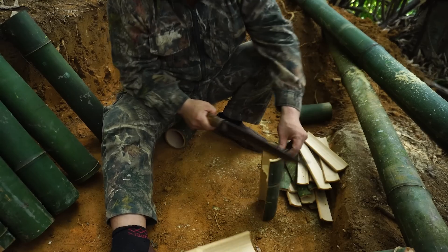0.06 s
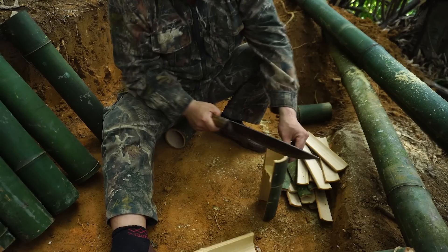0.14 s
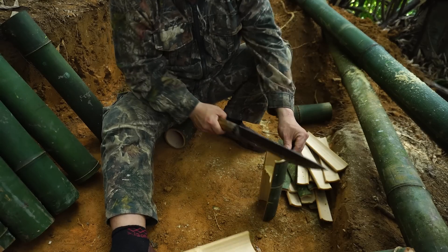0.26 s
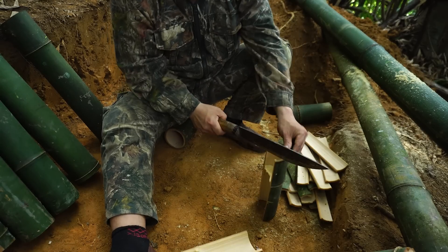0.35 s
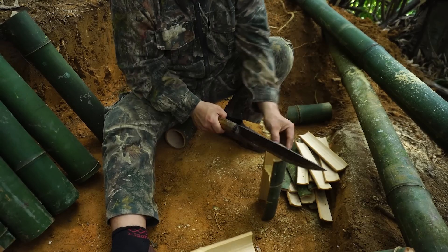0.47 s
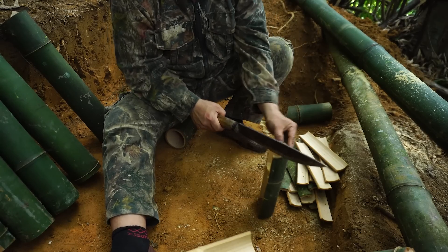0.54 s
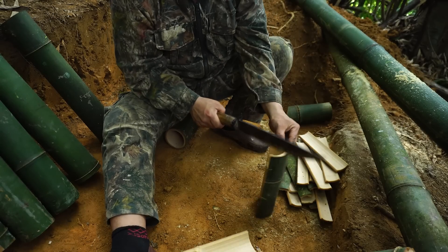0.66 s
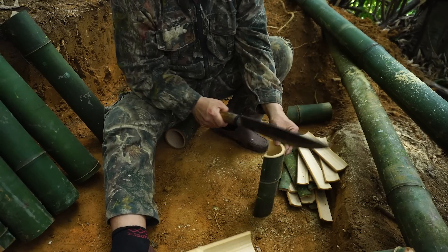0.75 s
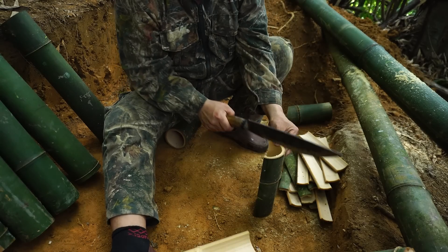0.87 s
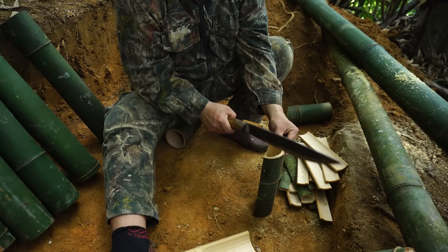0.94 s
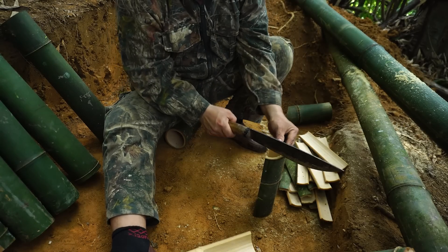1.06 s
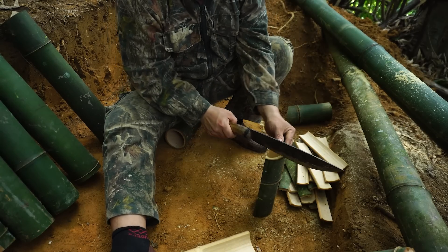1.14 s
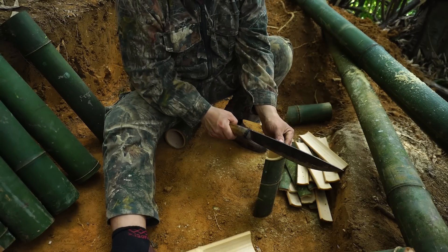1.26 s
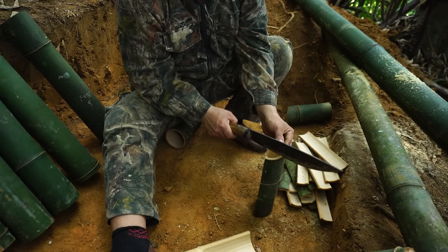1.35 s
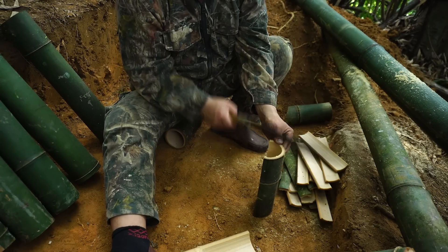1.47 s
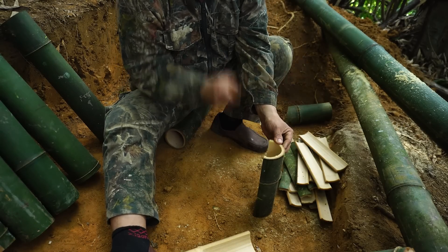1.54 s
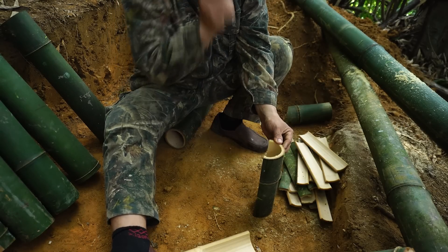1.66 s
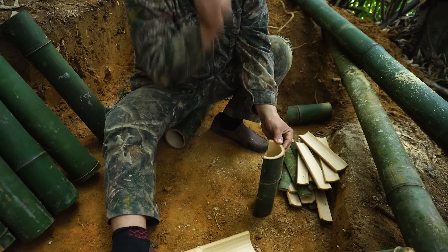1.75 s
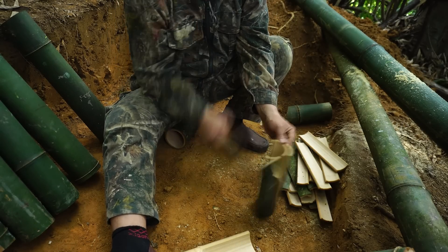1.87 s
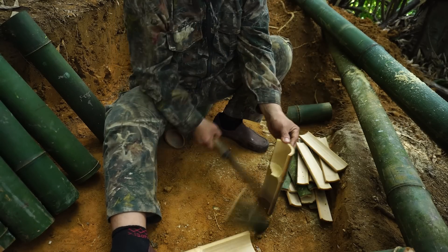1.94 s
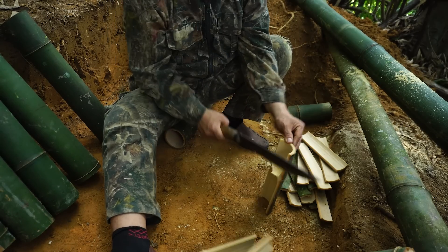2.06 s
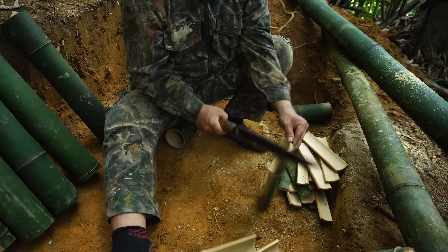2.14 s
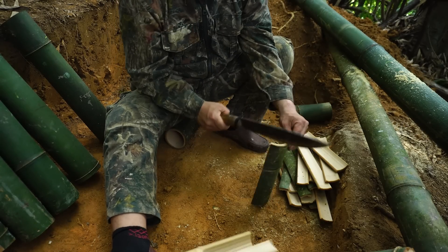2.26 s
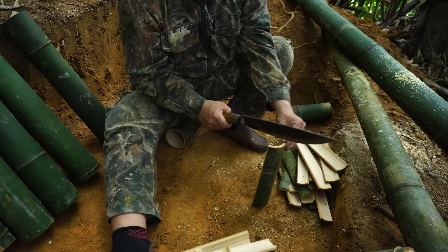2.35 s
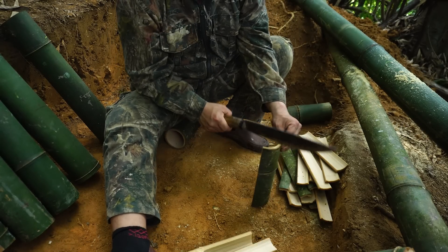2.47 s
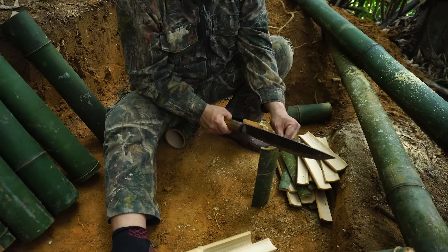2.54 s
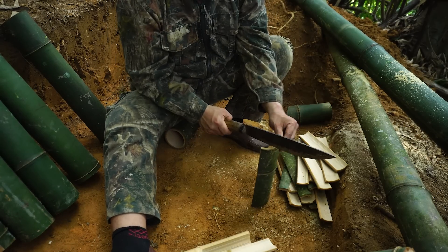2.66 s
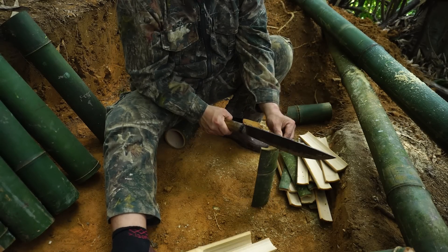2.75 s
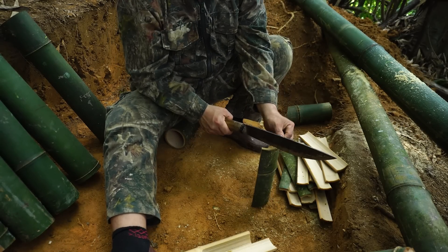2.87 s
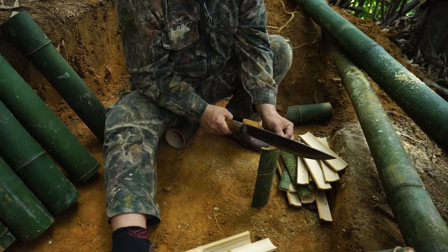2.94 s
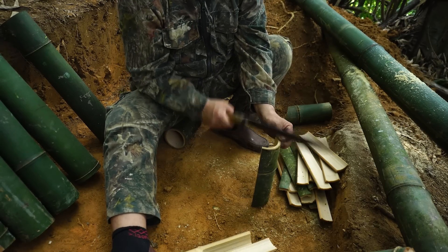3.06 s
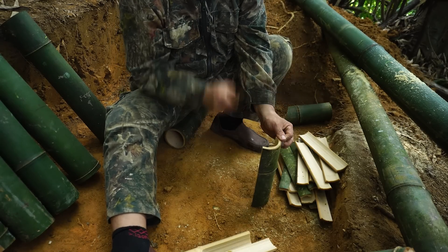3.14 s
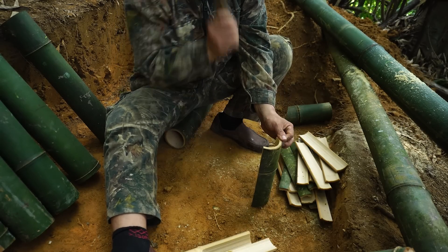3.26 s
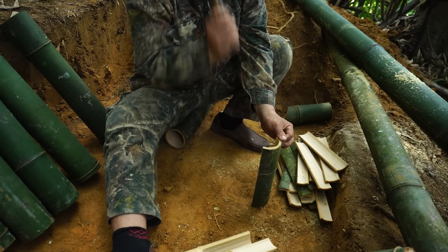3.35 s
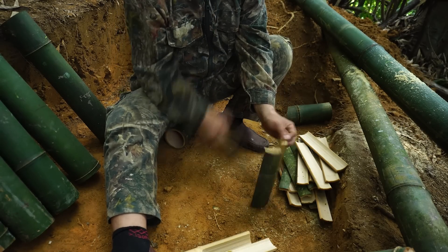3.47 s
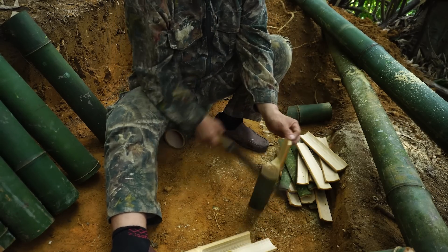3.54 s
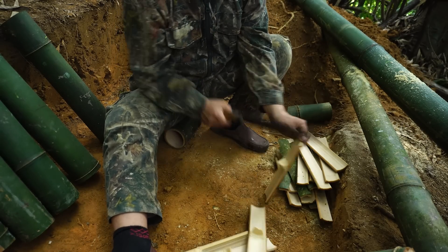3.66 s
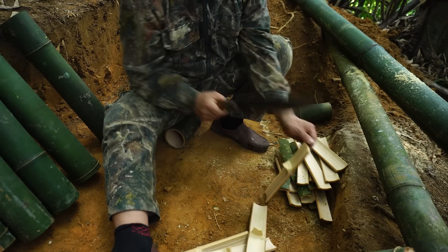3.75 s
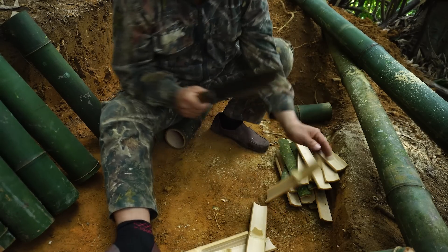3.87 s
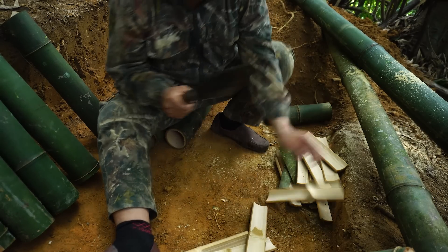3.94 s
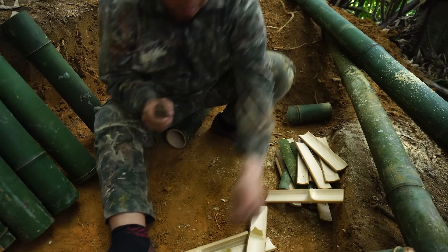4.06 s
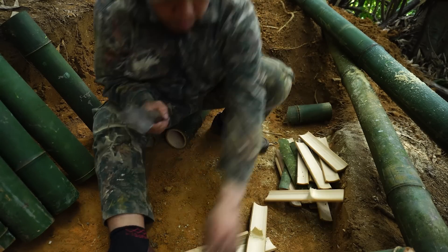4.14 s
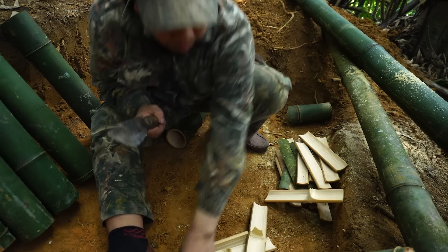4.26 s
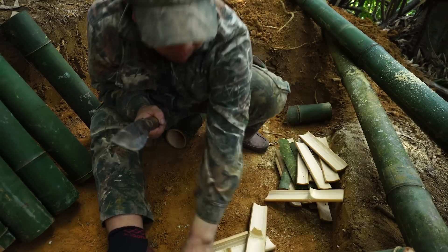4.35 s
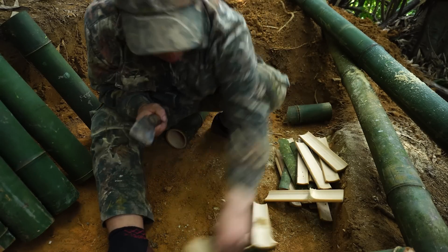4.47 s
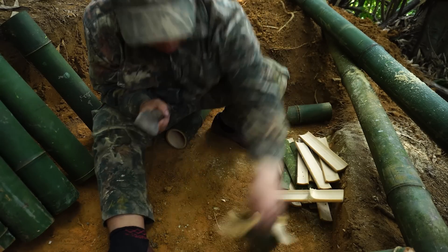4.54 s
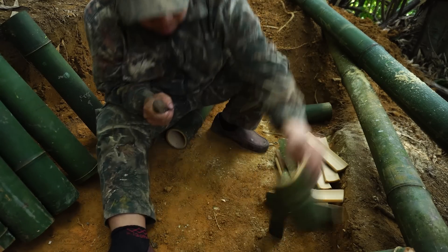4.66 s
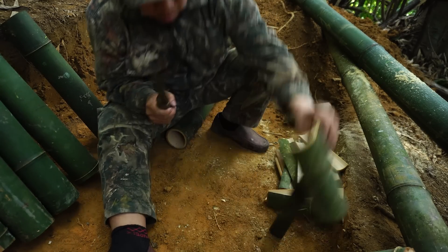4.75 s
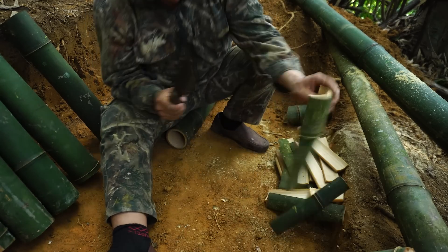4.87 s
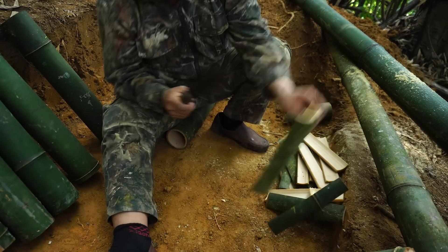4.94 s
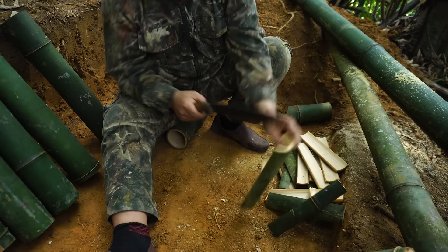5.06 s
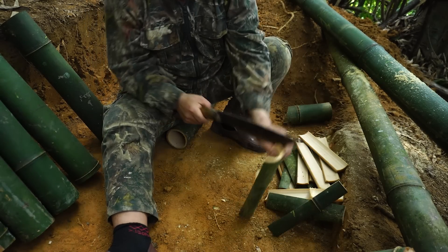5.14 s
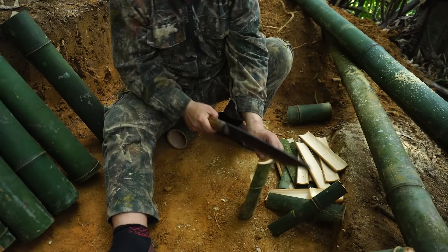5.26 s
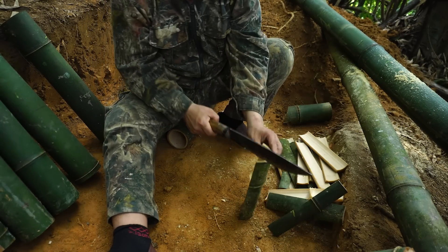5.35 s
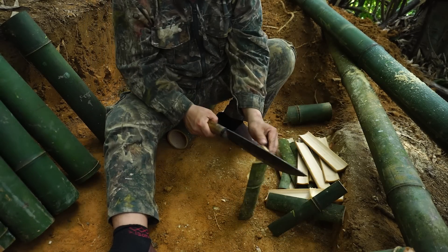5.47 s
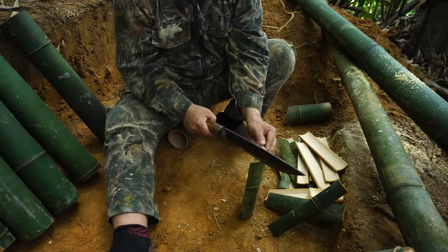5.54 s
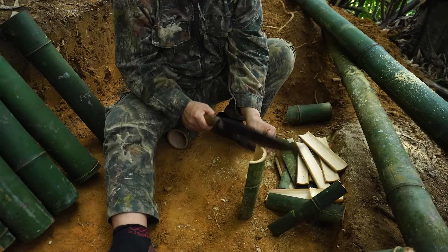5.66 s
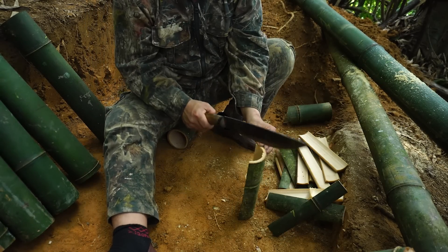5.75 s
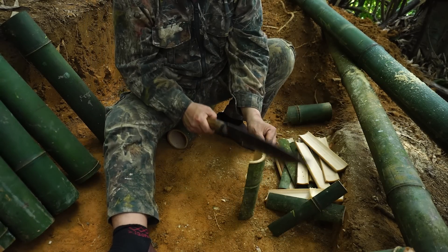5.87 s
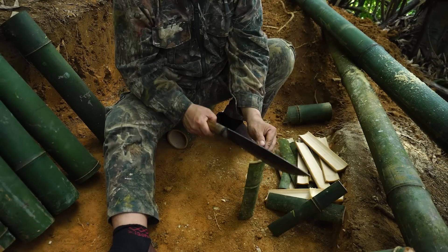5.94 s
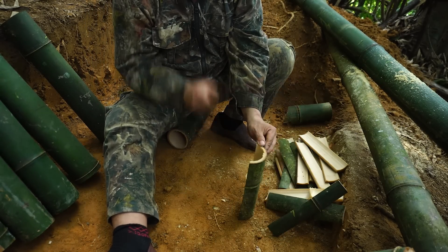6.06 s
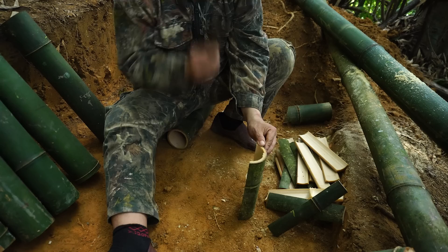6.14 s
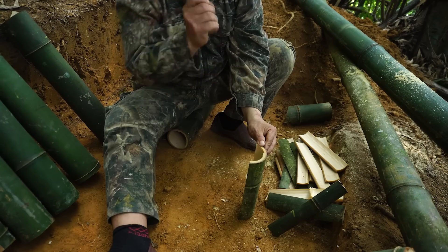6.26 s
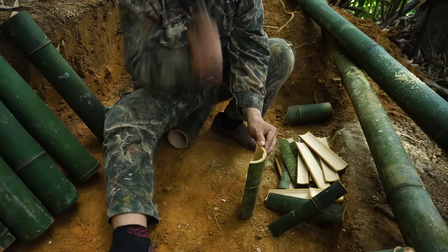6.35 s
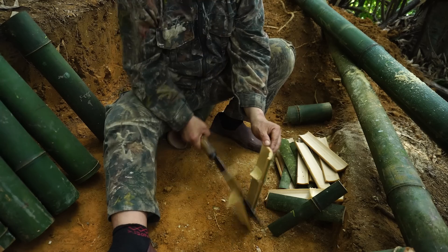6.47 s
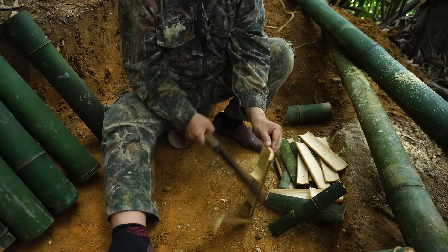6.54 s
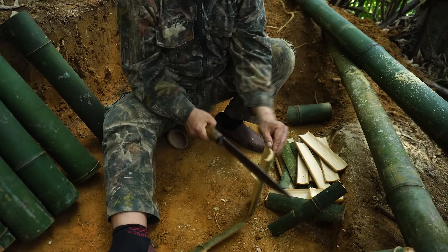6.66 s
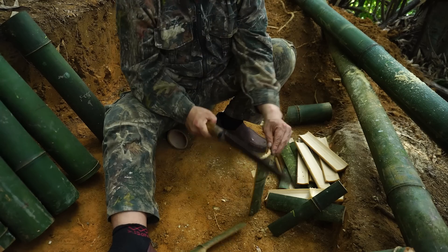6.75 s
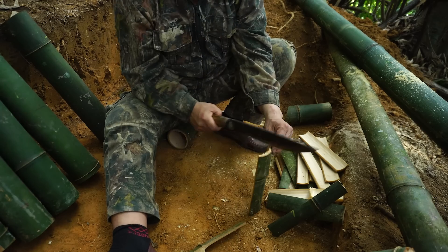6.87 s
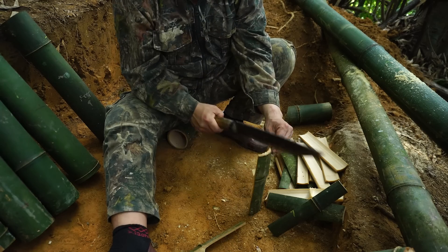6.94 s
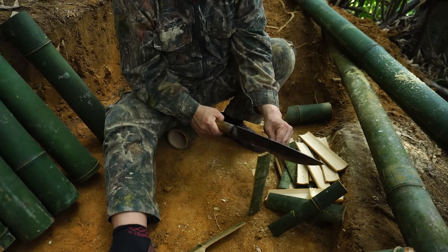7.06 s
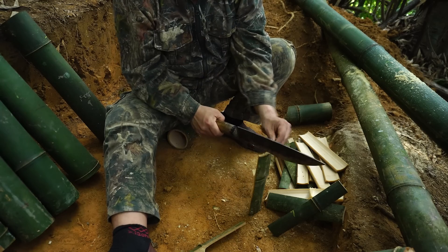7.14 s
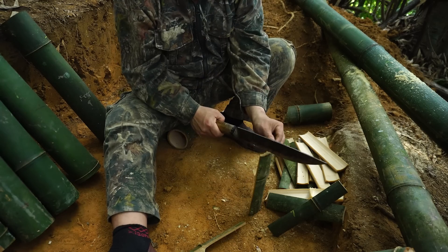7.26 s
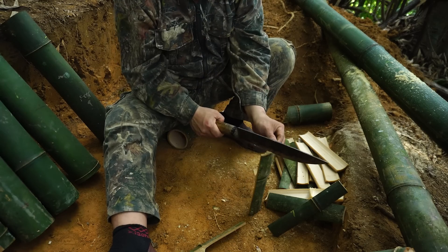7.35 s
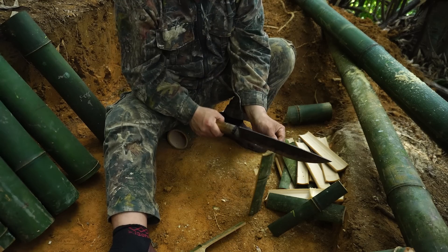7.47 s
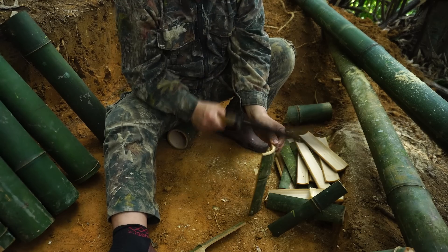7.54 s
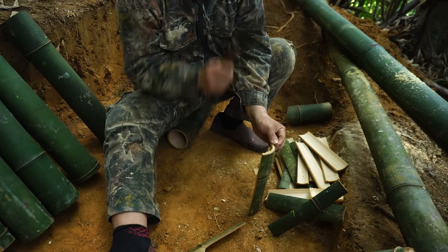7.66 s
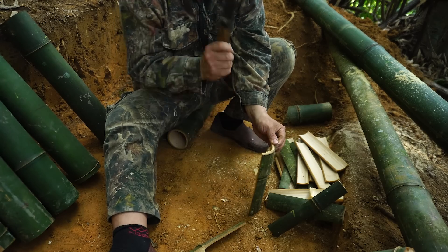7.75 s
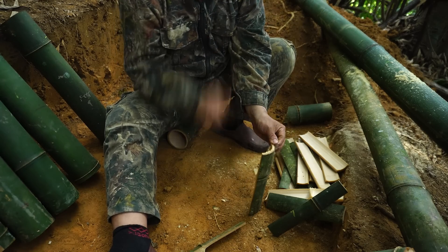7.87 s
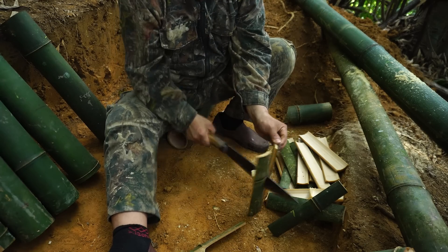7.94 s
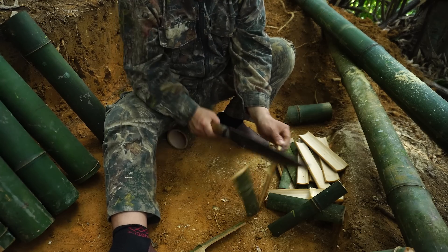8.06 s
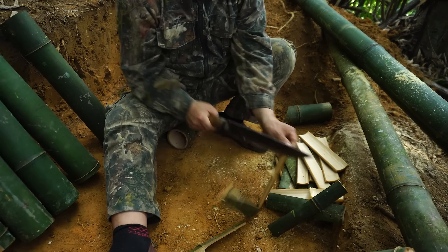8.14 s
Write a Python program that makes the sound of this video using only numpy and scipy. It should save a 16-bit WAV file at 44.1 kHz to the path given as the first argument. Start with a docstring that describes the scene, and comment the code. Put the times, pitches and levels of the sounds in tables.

```python
"""A blade is set lightly on bamboo, then splits it on bare earth in a forest: four chops, each a bite and a split.
From the first chop on, steel modes ring briefly, slats rock onto a pile as decaying modes, and earth thuds.
Between the second and third chops a piece is dragged by stick-slip friction and stood on the ground.
Dense noise echoes scatter the cracks off the trees; filtered noise gives air and insects throughout, and a
thin high whine swells after the first chop."""
import sys
import numpy as np
from scipy import signal
from scipy.fft import rfft, irfft
from scipy.io import wavfile
from scipy.ndimage import uniform_filter1d

SR = 44100
rng = np.random.default_rng(int(sys.argv[2]) if len(sys.argv) > 2 else 0)


def wav_record(signal):
    """Record a signal, one row per channel, as 16-bit PCM in the file named by sys.argv[1]."""
    frames = np.transpose(np.atleast_2d(signal))
    bounded = np.clip(frames, -1, 1)
    # unit amplitude maps onto the largest positive 16-bit level
    quanta = np.round(bounded * 32767).astype(np.int16)
    wavfile.write(sys.argv[1], SR, quanta)


N = 362061
T = np.arange(SR // 2) / SR  # time after a blow (s)
CLOCK = np.arange(N) / SR  # time in the scene (s)

# Spectrum of the dry tap of a contact: f/Hz, level/dB
CONTACT_SPECTRUM = [(60, -27), (250, -14), (700, 2), (1600, 0), (3200, 0), (6000, -13), (15000, -32.5)]


def chops():
    """Brittle fracture: a bite, then a split that frees the steel to sing; some strands snap later."""
    # The blade bites, then the wall splits: bite t/s, bite level/dB, wall f/Hz, wall ring/dB,
    # treble tilt/(dB per octave), split delay/s, split level/dB, split wall f/Hz, split wall ring/dB,
    # tail/dB, piece, its ring/dB, steel ring/dB, shift of the lowest steel mode by the grip/Hz
    chop_events = [(1.9150, -16, 2980, -1, 0, 0.011, -21.5, 3200, -10, -3.5, "whole tube", -20, -40.5, 1),
                   (3.5102, -16, 3430, -1, -0.5, .0132, -26.5, 3280, 9.5, -7, "split tube", -10.5, -42.5, 40),
                   (6.4702, -18.5, 2470, 4, 1.5, .0137, -18, 2340, -5.5, -4.5, "new tube", -18.5, -34.5, 25),
                   (7.9504, -17, 2220, -8.5, 2, 0.017, -17, 3270, -8, -9, "narrow stave", -17.5, -49, 70)]
    # Modes of the steel before the grip sharpens them: f/Hz, level/dB, t60/s
    steel_modes = [(11650, 0, .17), (11690, -8, .1), (13190, -2, .12), (13260, -2, .16)]
    # Strands snapping as a slat peels away: t/s, level/dB, treble tilt/(dB per octave), piece
    snap_events = [(1.946, -29, -0.5, "whole tube"), (2.030, -45, -8, "wide slat"),
                   (2.0797, -23.5, -1.5, "wide slat"), (2.156, -43.5, 1.5, "wide slat")]
    bite_t60, split_t60, snap_t60 = 0.031, 0.025, 0.041  # how fast the fibres fall quiet (s)
    split_tilt = 2.5  # dB per octave
    split_extra_ring_db = 2  # a split frees the piece to ring more
    snap_wall_hz, snap_wall_db, snap_tail_db, snap_ring_db = 2740, -8, -4, -16.5

    out = np.zeros((4, N))
    near, far = out[:2], out[2:]
    for (s, bite_db, wall_hz, wall_db, tilt, delay, split_db, split_hz, split_wall_db,
         tail_db, piece, ring_db, steel_db, sharp_hz) in chop_events:
        bite = crack(bite_db, wall_hz, wall_db, tilt, bite_t60, tail_db, piece, ring_db)
        split = crack(split_db, split_hz, split_wall_db, split_tilt, split_t60, tail_db, piece,
                      ring_db + split_extra_ring_db)
        sharpening = 1 + sharp_hz / steel_modes[0][0]
        steel = ring(steel_modes, tune=sharpening, rise=0.0094, lag=-0.0000098)
        add(out, s, bite)
        add(out, s + delay, split)
        # the steel leans left by this as well as by the lean of the whole chop
        add(near, s + delay, amp(steel_db) * steel * pan(db=3))
    for s, db, tilt, piece in snap_events:
        snap = crack(db, snap_wall_hz, snap_wall_db, tilt, snap_t60, snap_tail_db, piece, snap_ring_db)
        add(out, s, snap)
    return (near + forest(far)) * pan(db=3)


def crack(db, wall_hz, wall_db, tilt, t60, tail_db, piece, ring_db):
    """Impulsive excitation: wall, fibres and piece sound as a near pair and a pair sent to the trees."""
    # Spectrum of breaking fibres: f/Hz, level/dB
    fibre_spectrum = [(60, -61), (200, -33), (550, -9.5), (1000, -4), (1700, 1), (2600, 1.5), (4000, 1.5),
                      (5000, -6.5), (6500, -6), (8200, -11.5), (9800, -16), (15500, -21.5)]
    u = T * wall_hz / 1.9  # the wall swings widest after about two cycles
    wall = amp(wall_db) * u * np.exp(1 - u) * np.sin(2 * np.pi * wall_hz * T)
    fibres = burst(fibre_spectrum, t60, tilt, same=0.6)
    hollow = amp(ring_db) * ring(damped(piece), lag=0.000015)
    near = wall + fibres + hollow + amp(tail_db - 19.5) * tearing()
    far = amp(tail_db) * (fibres + amp(-1.5) * wall + amp(-3.5) * hollow)
    return amp(db) * np.vstack([near, far])


def tearing(snaps_per_s=900, t60=0.27):
    """Crack propagation: random snaps, read fast and then slower, fall in pitch as the split lengthens."""
    # Spectrum of the last fibres letting go, once the pitch has settled: f/Hz, level/dB
    tear_spectrum = [(80, -50), (400, -21), (1200, -20), (1700, 0), (2050, -8), (2700, -11), (4300, -7),
                     (7000, -17), (15000, -36)]
    rise, settle_s = 0.7, 0.038  # a short split rings higher by this share, then settles
    snaps = pair(0.58, len(T)) * (rng.random(len(T)) < snaps_per_s / SR)
    place = np.cumsum(1 + rise * np.exp(-T / settle_s)) / SR
    crackle = np.array([np.interp(place, T, side, right=0) for side in colour(snaps, tear_spectrum)])
    return evened(crackle) * dying(t60) * (1 - np.exp(-T / 0.03))


def damped(piece, length=1):
    """Damping: green bamboo on soil or in a hand loses energy fast, so every decay time is capped."""
    # How each piece of bamboo rings, before the cap: piece -> f/Hz, level/dB, t60/s
    piece_modes = { "whole tube": [(630, -5, 0.095), (1064, 1, 0.069), (1620, -1.5, 0.14), (2010, 18, 0.02),
                   (2270, -29, 0.025), (2830, 7, 0.043), (4270, 9, 0.035)],
                   "split tube": [(489, -11, 0.049), (1794, 2, 0.031), (2760, 3, 0.024), (3400, -12, 0.038),
                   (4600, -5, 0.057), (6160, 1.5, 0.032)], "new tube": [(240, -24, 0.14), (549, -7, 0.06),
                   (988, 1.5, 0.034), (1650, 3, 0.075), (2130, -10, 0.036), (2710, 14.5, 0.018),
                   (6770, 4, 0.026)], "narrow stave": [(225, -20, 0.15), (1507, -2.5, 0.067),
                   (2270, -5, 0.04), (3220, -25, .05), (4330, -1, 0.052), (8210, 12, 0.011)],
                   "wide slat": [(667, -15, 0.31), (797, -23, 0.19), (1017, -11.5, 0.24), (1520, 0, 0.12),
                   (1670, -6, .08), (1747, 1, 0.071), (1817, -5, 0.045), (1940, -13, .04),
                   (2530, -10, 0.046), (2840, -9, 0.053), (4140, -19.5, .07)],
                   "thin slat": [(646, -17.5, 0.16), (810, -19, 0.16), (1012, -7, 0.047),
                   (1112, -15.5, 0.22), (1356, -2.5, 0.045), (1535, 5.5, 0.039), (1793, -5, 0.13),
                   (2010, 0.5, 0.044), (2510, -19, 0.064), (2895, -5.5, 0.043), (3240, 3, 0.029),
                   (4480, -0.5, 0.04), (6100, -7.5, 0.021)], "half tube": [(688, -7, 0.11),
                   (774, -11.5, 0.15), (908, -2.5, 0.038), (955, -10, 0.054), (1550, -12, 0.12),
                   (1784, 3.5, 0.091), (2840, -10, 0.049), (3120, -6, 0.074), (4520, -36, .03),
                   (6170, -12, 0.018)]}
    longest_t60 = 0.115  # s
    return [(hz, db, min(t60 * length, longest_t60)) for hz, db, t60 in piece_modes[piece]]


def clatter():
    """Modal response to impact: a piece rings as each end lands with a dry tap; the blade only taps."""
    # Pieces landing on one end, then the other: t/s, level/dB, treble tilt/(dB per octave),
    # second end/dB, dry tap/dB, piece
    landings = [(2.0894, -17.5, -0.5, -10, -13.5, "wide slat"), (2.1244, -38.5, -5, -5.5, 4, "wide slat"),
                (2.158, -47, -10.5, -4, -6, "wide slat"), (2.310, -53.5, -1, -10, 3, "thin slat"),
                (2.349, -51.5, -8, -2, -6, "half tube"), (2.358, -45.5, -4.5, -6, -5.5, "thin slat"),
                (2.415, -60, 1, -5, -7, "thin slat"), (2.562, -59, 1, -10, -14, "thin slat"),
                (3.7455, -21.5, 0.5, -17, -3, "thin slat"), (3.8041, -30.5, -3.5, -7.5, -5, "thin slat"),
                (4.023, -56.5, 7, -24, -10, "half tube"), (4.405, -53.5, -1, -3, -10, "thin slat"),
                (4.661, -49.5, -3.5, -16, -9, "thin slat"), (4.7511, -42, -1.5, -26, 6.5, "half tube"),
                (4.9009, -34, 1.5, -2, -10, "half tube")]
    # The blade set lightly on the rim: t/s, level/dB
    blade_taps = [(.039, -49.5), (.345, -50), (1.11, -52)]
    rock_s = 0.0095  # time between the two ends
    # share of its free decay time kept on one end, and how much a firm second end shortens it
    ring_share, deadening = 0.85, 0.7

    out = np.zeros((2, N))
    for s, db, tilt, second_db, tap_db, piece in landings:
        decay_share = ring_share / (1 + deadening * amp(second_db))
        hollow = ring(damped(piece, decay_share), tilt, lag=0.00006)
        for delay, end_db in [(0, 0), (rock_s, second_db)]:
            contact = amp(tap_db) * burst(CONTACT_SPECTRUM, t60=0.03, tilt=tilt - 1.5, same=0.38)
            add(out, s + delay, amp(db + end_db) * (hollow + contact))
    for s, db in blade_taps:
        add(out, s, amp(db) * burst(CONTACT_SPECTRUM, t60=0.036, tilt=-2.5))
    return out * pan(db=3.5)


def thuds():
    """Heavily damped resonance: packed earth answers low and short, with a dry tap and crushed soil."""
    # Bamboo meeting the earth: t/s, level/dB, hardness as treble tilt/(dB per octave),
    # pitch factor, dry tap/dB
    earth_blows = [(1.927, -53, -2, 0.91, -12), (2.096, -40.5, -6, 1.2, -10), (2.129, -44.5, 0, 1.12, -9),
                   (3.546, -43, -5, 0.94, 3.5), (3.749, -45, 15.5, 1.05, -12), (4.023, -48.5, 6, 1.06, -12),
                   (5.238, -44, 1, 0.94, -19), (5.428, -61, 6, 0.95, -3), (5.984, -53.5, 1, 0.95, 2.5),
                   (6.698, -48.5, 17, 0.98, 3), (7.957, -41, 11, .96, -2)]
    # Modes of the ground before the pitch factor: f/Hz, level/dB, t60/s
    earth_modes = [(129, -32, 0.23), (182, -24, 0.02), (232, -4, 0.11), (354, -11.5, 0.082),
                   (545, 0, 0.015), (669, -25, 0.15)]
    # Spectrum of a puff of crushed soil: f/Hz, level/dB
    soil_spectrum = [(35, -41), (75, -19), (130, -3), (270, 8), (700, 3.5), (2000, -22), (8000, -39)]
    # the harder the landing, the brighter its tap (dB per octave)
    soft_tap_tilt, tilt_per_hardness = -9.5, 0.58

    out = np.zeros((2, N))
    for s, db, hardness, tune, tap_db in earth_blows:
        earth = ring(earth_modes, hardness, tune=tune, rise=0.0018, pivot_hz=230)
        soil = burst(soil_spectrum, t60=0.1, same=1)
        tap = burst(CONTACT_SPECTRUM, t60=0.04, tilt=soft_tap_tilt + tilt_per_hardness * hardness)
        add(out, s, amp(db) * (amp(-4) * earth + amp(-11.5) * soil + amp(tap_db) * tap))
    return out * pan(db=3)


def drag():
    """Stick-slip friction: catching grit rings a sliding slat, and each slip squeaks, falling and broken."""
    # Short pulls in which the slat slips: start t/s, length/s, level/dB, starting squeak f/Hz
    slips = [(4.481, .075, -62.5, 1920), (4.565, 0.036, -60, 2080), (4.594, 0.075, -57, 2060)]
    # Spectrum of soil rasping on bamboo: f/Hz, level/dB
    grit_spectrum = [(80, -55), (500, -31), (2000, 4), (4600, 1), (5400, -7), (7000, -2), (9500, -15),
                     (15000, -19)]
    grains_per_s, grain_spread_db = 1100, 2
    sag_hz_per_s = 2150  # the squeak falls as each slip slows
    pitch_jitter = 0.07  # share by which the squeak's pitch trembles
    start_s, length_s, scrape_db = 4.42, 0.41, -60  # grit swells and fades under the whole pull

    caught = rng.random(N) < grains_per_s / SR
    grit = pair(0.23, N) * caught * amp(grain_spread_db * rng.standard_normal(N))
    body = signal.fftconvolve(grit, ring(damped("thin slat"), tilt=0.5), axes=1)[:, :N]
    rasp = colour(grit, grit_spectrum)
    scrape = amp(-2.5) * evened(body) + amp(-4.5) * evened(rasp)
    scrape = amp(scrape_db) * arch(start_s, length_s) * scrape

    jitter = evened(uniform_filter1d(rng.standard_normal(N), size=60))
    grip = evened(uniform_filter1d(rng.standard_normal(N), size=300))
    squeak = 0
    for s, length, db, hz in slips:
        falling_hz = hz - sag_hz_per_s * np.clip(CLOCK - s, 0, length)
        phase = 2 * np.pi * np.cumsum(falling_hz * (1 + pitch_jitter * jitter)) / SR
        squeak = squeak + amp(db + 3.8 * grip) * arch(s, length) * np.sin(phase)
    return (scrape + squeak) * pan(db=3)


def shuffle():
    """Granular friction: cloth rubs and soles grind the soil as sparse noise grains under smooth swells."""
    # Clothes and shoes shifting: start t/s, length/s, level/dB
    shifts = [(2.084, 0.47, -66), (3.796, 0.38, -71), (6.72, 0.21, -71)]
    # Spectrum of rubbing cloth: f/Hz, level/dB
    cloth_spectrum = [(35, -46), (70, -27), (130, -14.5), (260, -4), (500, -5), (1200, -12), (2200, -4),
                      (6000, -21), (15000, -34)]
    grains = pair(0.91, N) * (rng.random(N) < 3500 / SR)
    level = sum(amp(db) * arch(s, length) for s, length, db in shifts)
    return level * evened(colour(grains, cloth_spectrum))


def forest(x):
    """Multiple scattering: echoes off trunks build over some tens of milliseconds and die by band."""
    # Echo of the trees: f/Hz, level/dB, t60/s
    echo_bands = [(216, 19.5, 0.087), (970, -15.5, 0.54), (2200, -8, 0.35), (4500, -12, 0.5),
                  (8000, -12, 0.57), (15300, -5, 0.46)]
    bands_hz, echo_db, t60 = np.transpose(echo_bands)
    taps = rng.standard_normal((2, len(T))) * (rng.random((2, len(T))) < 3000 / SR)
    taps = taps + 0.28 * taps[::-1]  # some of each side reaches the other
    hz, t, z = signal.stft(taps, SR, nperseg=256)
    fade = np.exp(-np.log(1000) * t / read(np.c_[bands_hz, t60], hz)[:, None])
    tail = signal.istft(z * fade, SR, nperseg=256)[1][:, :len(T)]
    tail = tail * (1 - np.exp(-T / 0.018))
    tail = evened(tail) / np.sqrt(len(T))  # unit energy
    gain = amp(read(np.c_[bands_hz, echo_db], np.fft.rfftfreq(len(T), 1 / SR)))
    tail = irfft(rfft(tail) * gain, len(T))
    return signal.fftconvolve(x, tail, axes=1)[:, :N]


def insects():
    """Incoherent superposition: many far insects merge into a shimmering noise band, with a thin whine."""
    # Spectrum of the chorus: f/Hz, level/dB
    chorus_spectrum = [(2400, -41.5), (2750, -12.5), (2950, -1), (3150, -0.5), (3450, -1), (3700, -0.5),
                       (3950, -3), (4200, -10.5), (4600, -26.5)]
    whine_db, whine_start_s, whine_length_s = -86.5, 2.7, 5.6  # one high insect swells and fades
    hz = np.fft.rfftfreq(N, 1 / SR)
    chorus_gain = amp(read(chorus_spectrum, hz)) * (abs(hz - 3500) < 1300)
    chorus = evened(irfft(rfft(pair(0.41, N)) * chorus_gain, N))
    flutter_hz = np.geomspace(0.3, 14, 20)
    swell_db = evened(sum(np.sin(2 * np.pi * (f * CLOCK + rng.random())) for f in flutter_hz))
    chorus = amp(-61.5 + swell_db) * chorus * pan(db=2.5)
    whine = evened(irfft(rfft(pair(0.1, N)) * np.exp(-((hz - 8250) / 220) ** 2), N))
    whine = amp(whine_db) * arch(whine_start_s, whine_length_s) * whine * pan(db=5)
    return chorus + whine


def air():
    """Diffuse field: the soft, wide rush of the forest is noise whose sides are partly coherent by band."""
    # Spectrum of the rush: f/Hz, level/dB
    air_spectrum = [(25, -95), (60, -29), (110, -19), (180, -15), (300, -3.5), (480, 2.5), (750, 4.5),
                    (1300, 0.5), (2500, -4.5), (4500, -9.5), (6500, -16), (10000, -20.5), (15500, -24.5)]
    # Left-right likeness: f/Hz, coherence/1
    air_likeness = [(100, 0.17), (300, 0.21), (700, 0.64), (1500, 0.48), (3000, 0.16), (15000, 0.33)]
    # Phase by which the right leads: f/Hz, phase/rad
    air_lead = [(100, 1.14), (430, 1.93), (1000, 2.35), (2300, 2.14), (4500, 1.1), (15000, 0.45)]
    # Left minus right: f/Hz, level/dB
    air_lean = [(100, -1.5), (400, 2), (1300, 4), (4400, 8), (8000, 11.5), (15000, 6.5)]
    hz = np.fft.rfftfreq(N, 1 / SR)
    a, b = rfft(rng.standard_normal((2, N)))
    same = read(air_likeness, hz)
    right = (same * a + np.sqrt(1 - same ** 2) * b) * np.exp(1j * read(air_lead, hz))
    lean = amp(read(air_lean, hz) / 2)
    out = irfft(np.array([a * lean, right / lean]) * amp(read(air_spectrum, hz)), N)
    return amp(-63.5) * out / out.std()


def ring(modes, tilt=0, length=1, tune=1, rise=0.00037, lag=0., pivot_hz=1500):
    """Modal superposition: struck modes start together and beat; the left's phase leads by lag seconds."""
    t = T + np.array([[lag], [0]])
    out = 0
    for hz, db, t60 in modes:
        level = amp(db + tilt * np.log2(hz / pivot_hz))
        out = out + level * dying(t60 * length) * np.sin(2 * np.pi * hz * tune * t)
    # a small body radiates little below its lowest mode
    radiation = signal.butter(3, 0.75 * modes[0][0], "high", fs=SR, output="sos")
    return signal.sosfilt(radiation, out * (1 - np.exp(-T / rise)))


def burst(points, t60, tilt=0, same=0.7):
    """Shot noise: a quick spray of tiny fractures, its energy set by its length and not its spectrum."""
    shape = dying(t60) * (1 - np.exp(-T / 0.0012))
    return evened(colour(pair(same, len(T)) * shape, points, tilt)) * np.sqrt(np.mean(shape ** 2))


def colour(x, points, tilt=0):
    """Minimum-phase filtering: causal, unit energy, tilted above 1 kHz in dB per octave."""
    hz = np.abs(np.fft.fftfreq(2048, 1 / SR))
    gain_db = read(points, hz) + tilt * np.log2(np.maximum(hz, 1000) / 1000)
    log_gain = np.log(amp(gain_db))
    # the Hilbert transform of the log gain gives the minimum phase
    taps = np.fft.ifft(np.exp(np.conj(signal.hilbert(log_gain)))).real
    return signal.fftconvolve(x, taps[None] / np.linalg.norm(taps), axes=1)[:, :x.shape[1]]


def pair(same, size):
    """Partial coherence: two noises that share a correlation of same."""
    a, b = rng.standard_normal((2, size))
    return np.array([a, same * a + np.sqrt(1 - same ** 2) * b])


def dying(t60):
    """Exponential decay: the amplitude falls 60 dB in t60 seconds."""
    return np.exp(-np.log(1000) * T / t60)


def arch(start, length):
    """Amplitude envelope: half a sine swells from silence and back."""
    return np.sin(np.pi * np.clip((CLOCK - start) / length, 0, 1))


def pan(db):
    """Level difference between the ears: left minus right in dB."""
    return amp(np.array([[db], [-db]]) / 2)


def amp(db):
    """Decibel law: level to amplitude factor."""
    return 10 ** (np.asarray(db) / 20)


def evened(x):
    """Root-mean-square normalisation of each channel to one."""
    return x / np.sqrt(np.mean(x ** 2, axis=-1, keepdims=True) + 1e-20)


def read(points, hz):
    """Logarithmic frequency scale: interpolate a table on it."""
    f, value = np.transpose(points)
    return np.interp(np.log(hz + 1), np.log(f), value)


def add(mix, s, sound):
    """Linear superposition: add a sound into the mix from s seconds on."""
    part = mix[:, round(s * SR):][:, :sound.shape[-1]]
    part += sound[..., :part.shape[1]]


def scene():
    """Superposition of all sources, with a fainter forest echo of the loose pieces."""
    loose = clatter() + thuds() + drag()
    echo = amp(-13) * forest(loose)
    return chops() + loose + echo + shuffle() + insects() + air()


def record(dry):
    """Band limiting: a linear-phase low-pass removes the highest treble."""
    edge_hz = 15850
    low_pass = signal.firwin(511, edge_hz, window=("kaiser", 9), fs=SR)
    return signal.oaconvolve(dry, low_pass[None], "same")


dry = scene()
out = record(dry)
wav_record(out)
```